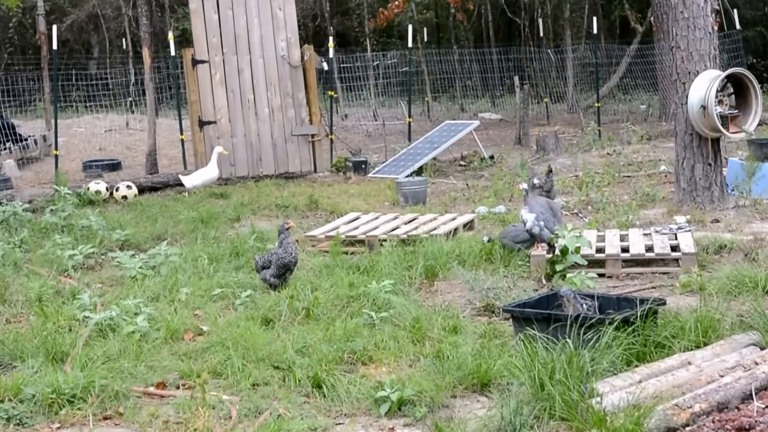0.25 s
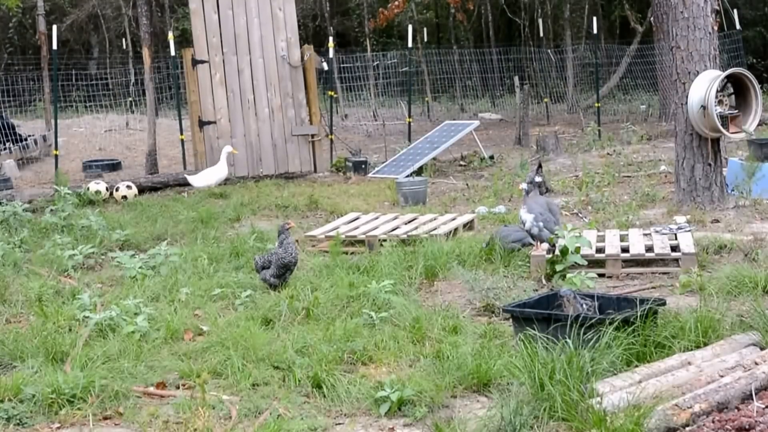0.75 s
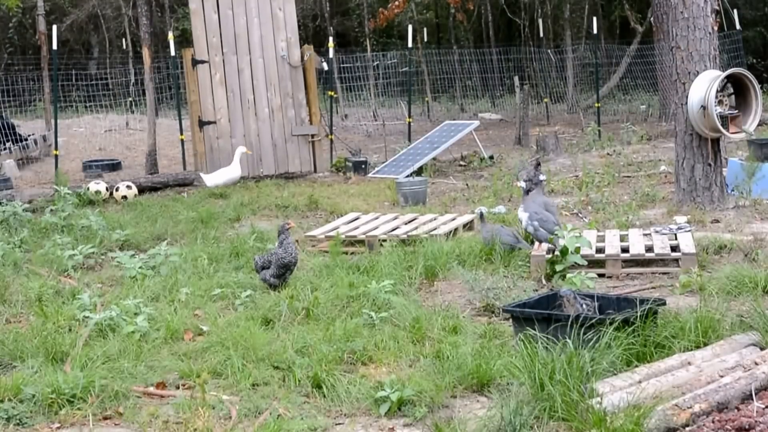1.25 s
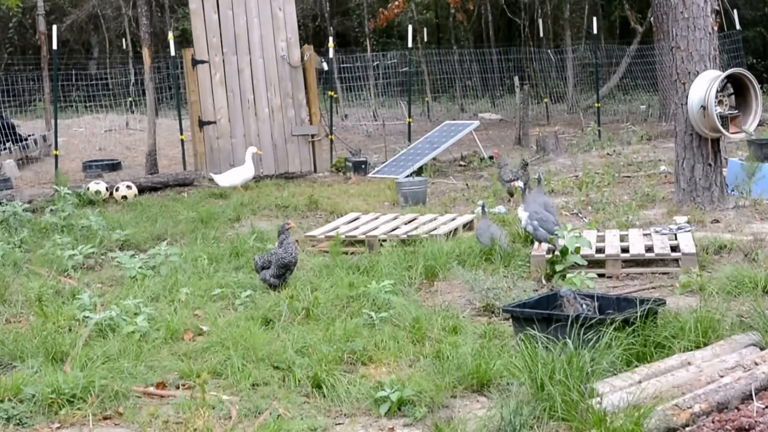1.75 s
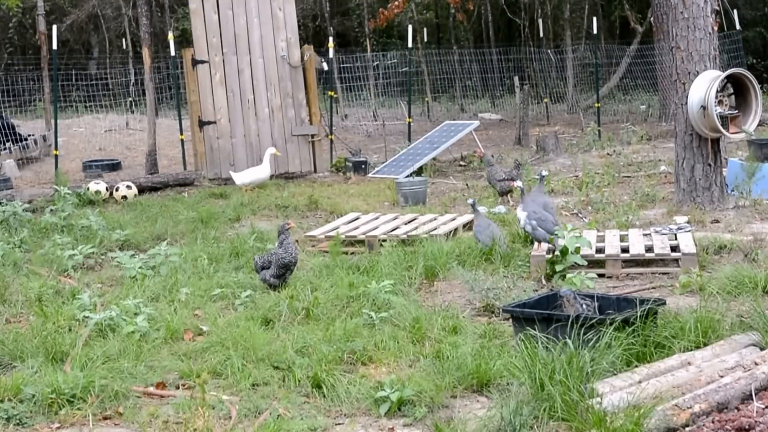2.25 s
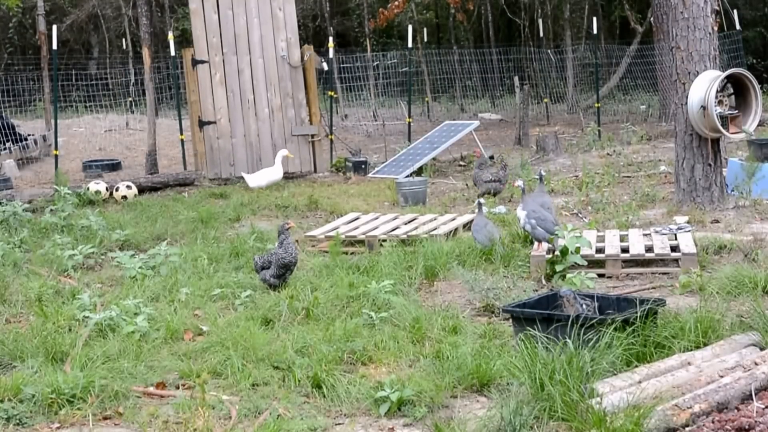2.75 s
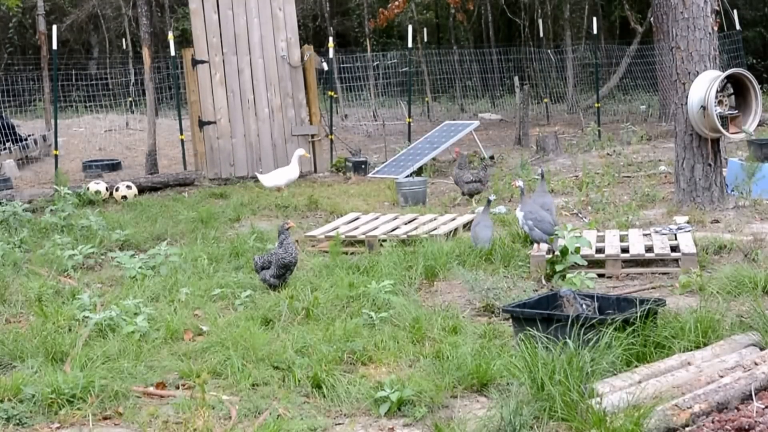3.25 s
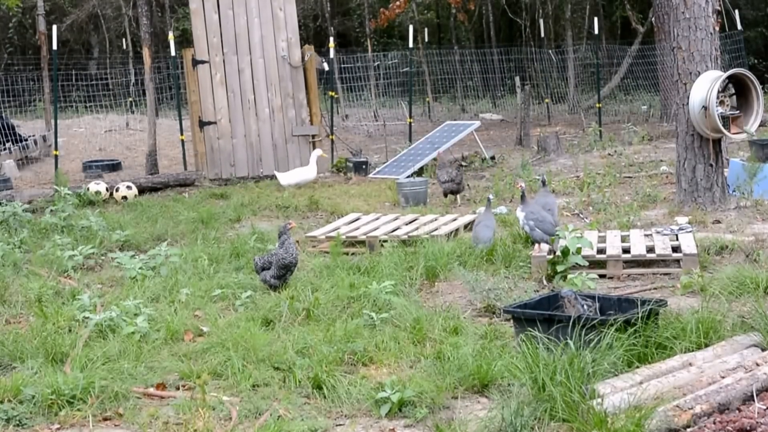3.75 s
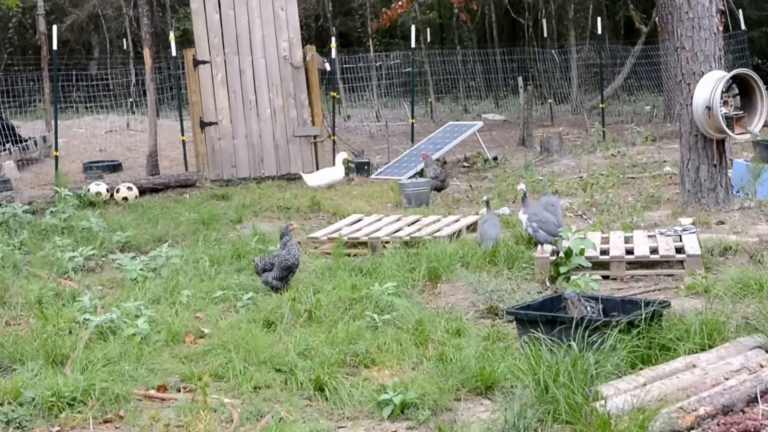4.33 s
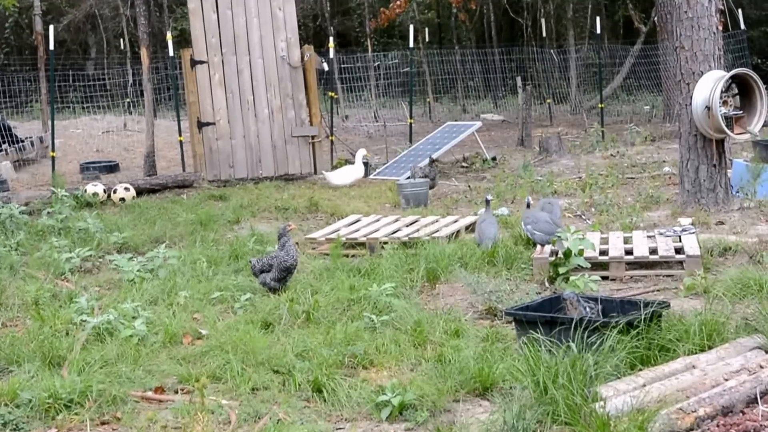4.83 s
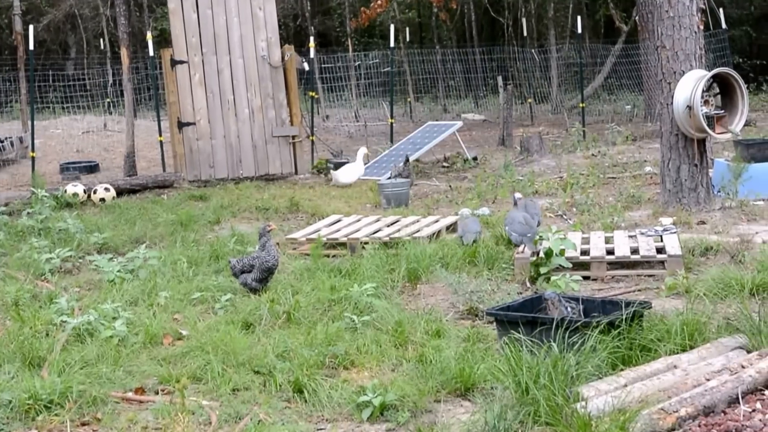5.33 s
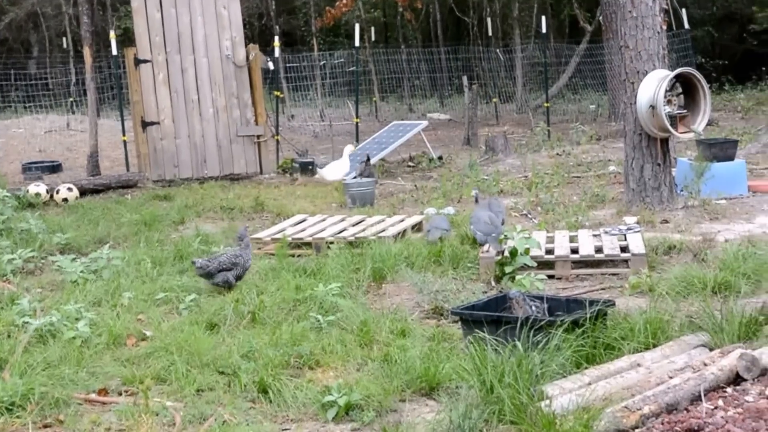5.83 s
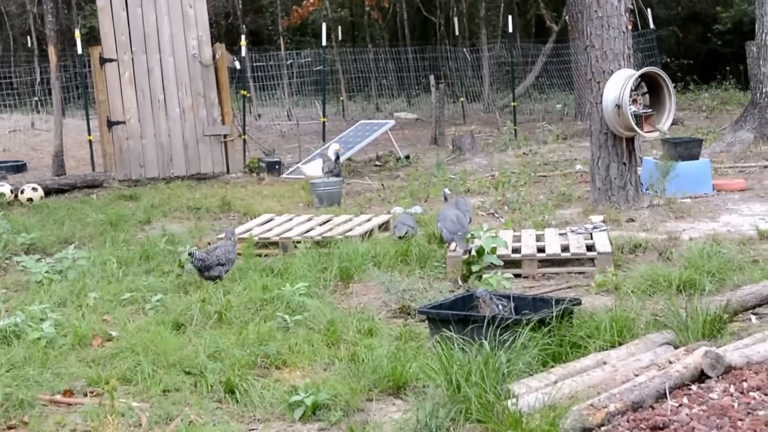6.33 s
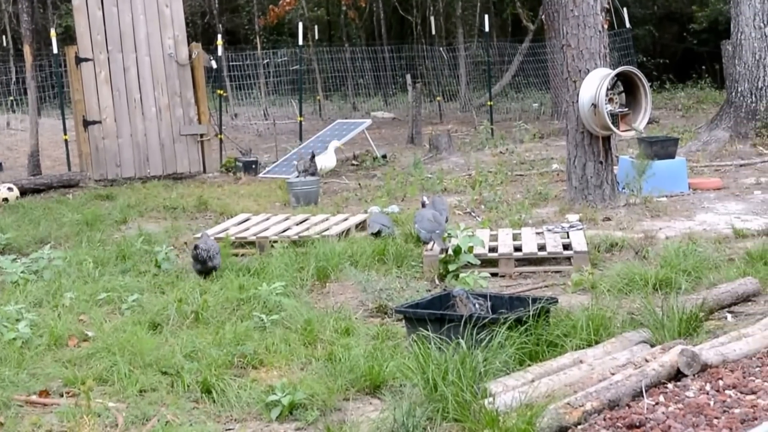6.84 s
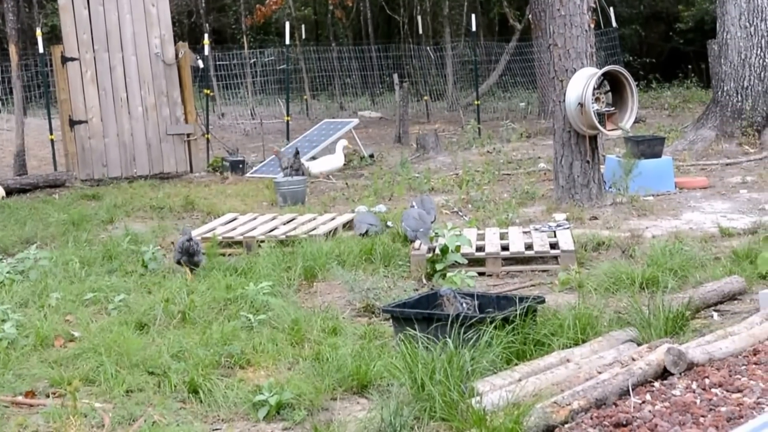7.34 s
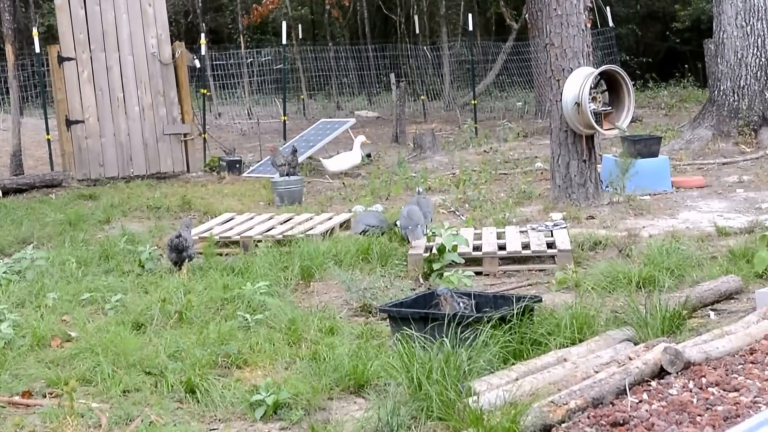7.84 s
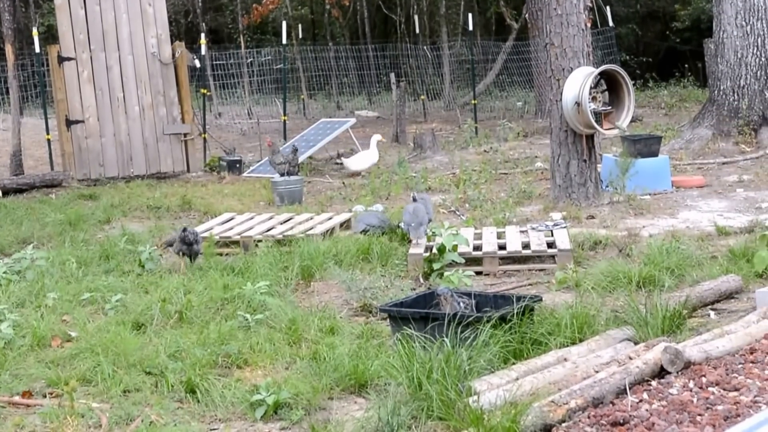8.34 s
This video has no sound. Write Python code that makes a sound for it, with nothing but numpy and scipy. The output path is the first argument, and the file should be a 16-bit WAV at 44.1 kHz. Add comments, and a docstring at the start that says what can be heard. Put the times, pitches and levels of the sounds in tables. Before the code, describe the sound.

Light rain patters outdoors with faint bird peeps, then a guinea fowl calls in short, increasingly raspy notes as a second bird yelps.

```python
"""Guinea fowl in light rain.

In a fenced poultry yard by a wood, drops pat and splash on the soil over a soft wash and a faint hum.
A guinea fowl starts with clear honks (syrinx harmonics) and works up to harsh squawks (uneven pulses
through windpipe and throat) that ring back from the trees; a second bird yelps in between.
Thin rising peeps, a few chirps and soft hen coos are nearly pure gliding tones."""
import sys
import numpy as np
from scipy import signal
from scipy.fft import rfft, irfft, next_fast_len
from scipy.io import wavfile
from scipy.ndimage import uniform_filter1d, minimum_filter1d

SR = 44100
rng = np.random.default_rng(int(sys.argv[2]) if len(sys.argv) > 2 else 0)


def wav_out(sig):
    """Save sig, one row per channel (or a flat mono array), as 16-bit PCM at SR to the path in sys.argv[1]."""
    wavfile.write(sys.argv[1], SR, np.round(np.clip(np.atleast_2d(sig).T, -1, 1) * 32767).astype(np.int16))


N = 377937
TIME_S = np.arange(N) / SR

# spectrum of far rain and air: freq_hz, density_db
WASH_SPECTRUM = [(15, -43), (25, -3.5), (108, -9.5), (217, -11), (270, -7), (326, -10), (451, -4),
                 (560, -3.5), (754, -0.5), (2760, -8.5), (5570, -15.5), (6920, -15.5), (10100, -14.5),
                 (14800, -21.5), (16000, -33)]
# left-right likeness of the wash: freq_hz, correlation
WASH_CORRELATION = [(30, -.45), (70, -.2), (125, .05), (250, .5), (500, .9), (1000, .97), (8000, .95),
                    (12000, .88)]
# strength of the wash: time_s, level_db
WASH_LEVEL = [(0, -43.5), (1.07, -43.5), (2.5, -46), (3.75, -42.5), (7.3, -48), (7.45, -43.5),
              (8.55, -42.5)]
# low distant swells: centre_s, width_s, level_db
HUM_SWELLS = [(1.41, .08, -57), (6.40, 0.15, -62.5)]
# heaviest near drops: start_s, level_db, treble_db
HEAVY_DROPS = [(.201, -18.5, -7.5), (.347, -24.5, -7), (.6101, -20.5, -10.5), (.6861, -34, 10.5),
               (.9017, -6, -20), (.908, -24.5, 1.5), (1.0319, -24, -7), (1.2461, -22, -21),
               (1.4158, -18.5, -16), (1.5749, -17.5, -20), (2.0748, -21, -19), (2.7461, -18.5, -13.5),
               (2.8995, -23.5, -7), (3.1314, -21.5, -6), (3.244, -19.5, -5.5), (3.3949, -24, -9),
               (3.9973, -14.5, -12), (5.0405, -9.5, -17.5), (5.2906, -18, -9), (5.4412, -19, -11),
               (5.6503, -17, -15), (7.3096, -21, -17), (7.3646, -24, -9), (7.677, -21.5, -9),
               (7.9312, -13.5, -11.5), (8.386, -16.5, -10.5)]
# reflections from ground, pallets and tub: delay_s, gain_db
YARD_REFLECTIONS = [(.0029, -19), (.0094, -9.5), (0.0128, -22)]
# colour of the echo from the trees: freq_hz, gain_db
ECHO_SPECTRUM = [(300, 10), (1000, -4), (2150, -1), (3000, 0), (4200, 2.5), (7000, -1), (15000, -4)]
# soft hen coos: start_s, length_s, first_hz, last_hz, level_db
HEN_COOS = [(.675, 0.06, 542, 590, -45.5), (.945, 0.047, 554, 579, -44.5), (1.23, 0.065, 630, 548, -47)]
# chirps: start_s, length_s, first_hz, last_hz, level_db
BIRD_CHIRPS = [(1.464, .064, 3600, 3876, -41), (2.856, .035, 2600, 3520, -46),
               (3.034, .043, 2460, 3370, -39), (4.546, 0.046, 2360, 3490, -38.5)]
# thin rising peeps: start_s, top_hz, level_db
BIRD_PEEPS = [(0.198, 8720, -32), (.302, 7900, -48), (1.704, 8500, -45), (2.159, 9200, -33.5),
              (2.912, 8200, -47), (3.226, 8700, -49), (6.32, 8840, -35.5), (7.305, 7840, -51),
              (8.065, 9100, -34)]
# second bird: start_s, length_s, pitch_hz, fall_share, level_db, tone_over_rasp_db
BIRD_YELPS = [(5.971, 0.041, 1548, 0.062, -17.5, 8), (6.028, 0.079, 1623, 0.024, -22.5, 1),
              (6.175, .027, 1128, 0.077, -21.5, -8), (6.287, .037, 1123, 0.185, -16, 18),
              (6.363, 0.029, 1718, 0.042, -19, 4), (6.38, .019, 1216, 0.052, -14, 17),
              (6.458, 0.033, 1713, .061, -22, -2), (6.574, 0.016, 1099, 0.065, -17.5, -15)]
# guinea fowl's bout: start_s, length_s, pitch_hz, level_db
FOWL_NOTES = [(3.802, 0.03, 960, -22.5), (4.02, .045, 985, -15), (4.212, 0.046, 1000, -11),
              (4.73, 0.036, 1012, -16.5), (4.961, .052, 986, -20.5), (5.139, .05, 1001, -12.5),
              (5.306, 0.064, 1069, -17), (5.491, 0.058, 1017, -14.5), (5.669, 0.059, 1059, -14.5),
              (5.857, .053, 1020, -13.5), (6.009, .048, 998.5, -11), (6.243, 0.056, 1075, -15),
              (6.482, .06, 1072, -13.5), (6.734, 0.062, 1062, -14.5), (6.951, 0.05, 1063, -15)]
# clear honks, forced rasps, then half clear: time_s, tone_over_rasp_db
FOWL_CLARITY = [(3.8, 7.5), (4.2, 12), (4.73, 7.5), (4.96, 2), (5.14, 9.5), (5.3, -24), (6.0, -12.5),
                (6.25, -3.5), (6.95, 0)]
# beak opening, 0 half shut to 1 wide: time_s, gape_share
BEAK_GAPE = [(3.8, 0.22), (5.5, 0.25), (6.0, 0.39), (6.25, 0.99), (6.95, 0.74)]
# clear tone by beak opening: harmonic_number, half_shut_db, wide_db
TONE_HARMONICS = [(1, -6.5, 0.5), (2, -5, 19), (3, 7, -12.5), (4, -6, -18), (5, -23, -9)]
# rasp colour, beak half shut: freq_hz, gain_db
RASP_HALF_SHUT = [(180, -69.5), (300, -48), (356, -25.5), (884, -24), (1060, -17), (1170, -15),
                  (1400, -0.5), (1620, -2.5), (1750, -11.5), (2050, -2.5), (3130, -6.5), (3350, 0),
                  (3620, -9.5), (3920, -5), (7000, -35), (9100, -44), (15400, -120)]
# rasp colour, beak wide: freq_hz, gain_db
RASP_WIDE = [(180, -71), (300, -62), (850, -48.5), (1050, -10), (1260, -16.5), (1400, -15.5), (1560, -8),
             (1920, -13.5), (2140, -9), (2610, -8), (2860, -1), (3570, -11), (4780, -10.5), (6220, -23),
             (7000, -24.5), (9100, -21.5), (15400, -120)]
# hiss colour, beak half shut: freq_hz, gain_db
BREATH_HALF_SHUT = [(3530, -25), (6000, 3.5), (8130, 0.5), (10200, 6.5), (12200, -2), (13600, -7),
                    (15300, -11), (16000, -12)]
# hiss colour, beak wide: freq_hz, gain_db
BREATH_WIDE = [(3530, -34), (6000, -25.5), (6700, -22), (7280, -4), (8100, -9.5), (10200, 4.5),
               (12900, -3.5), (16000, -15)]

SPLASH_HZ, SPLASH_WIDTH_HZ = 3500, 7000


def from_db(db):
    """Decibels to gain."""
    return 10 ** (np.asarray(db) / 20)


def unit_rms(x):
    """Scale to unit rms."""
    return x / np.sqrt(np.mean(x ** 2) + 1e-20)


def hold_rms(x, window_s=.0049):
    """Hold the short-term rms near 1."""
    power = np.maximum(uniform_filter1d(x * x, int(window_s * SR) + 1), 0)
    return x / np.sqrt(power + 1e-3 * np.mean(x * x))


def at_hz(points, hz):
    """Read a table on a log-frequency axis."""
    freq_hz, value = np.transpose(points)
    return np.interp(np.log(hz + 1e-3), np.log(freq_hz), value)


def at_time(points, time_s):
    """Read a table on a time axis."""
    return np.interp(time_s, *np.transpose(points))


def colour(x, spectrum):
    """Minimum-phase filter with the given spectrum."""
    size = 2 * next_fast_len(len(x))
    cepstrum = irfft(np.log(from_db(at_hz(spectrum, np.fft.rfftfreq(size, 1 / SR)))))
    cepstrum[1:size // 2] *= 2
    cepstrum[size // 2 + 1:] = 0
    return irfft(rfft(x, size) * np.exp(rfft(cepstrum)))[:len(x)]


def drift(rate_hz, size):
    """Smooth random curve, spread near 1."""
    position = np.arange(size) * rate_hz / SR
    knots = int(position[-1]) + 2
    return np.interp(position, np.arange(knots), rng.standard_normal(size)[:knots])


def resonate(x, hz, width_hz):
    """Two-pole resonance, peak gain 1."""
    r = np.exp(-np.pi * width_hz / SR)
    feedback = [1, -2 * r * np.cos(2 * np.pi * hz / SR), r * r]
    return signal.lfilter(np.array([1, 0, -1]) * (1 - r * r) / 2, feedback, x + 1e-18)


def add(out, start_s, x):
    """Mix x in at start_s."""
    i = max(int(start_s * SR), 0)
    out[i:i + len(x)] += x[:max(N - i, 0)]


def envelope(t, length_s, attack_s, release_s):
    """Smooth rise, hold, exponential decay after length_s."""
    rise = np.sin(np.pi / 2 * np.clip(t / attack_s, 0, 1)) ** 2
    return rise * np.exp(-np.maximum(t - length_s, 0) / release_s)


def rain_wash():
    """Distant rain merges to a soft hiss; mainly the low stir of air differs between the ears."""
    hz = np.fft.rfftfreq(2 * N, 1 / SR)
    alike = np.clip(at_hz(WASH_CORRELATION, hz), -.5, .999)
    mid, side = rfft(rng.standard_normal((2, 2 * N))) * from_db(at_hz(WASH_SPECTRUM, hz))
    stereo = irfft(np.sqrt(1 + alike) * mid + np.sqrt(1 - alike) * side * [[1], [-1]])[:, :N]
    return unit_rms(stereo) * from_db(at_time(WASH_LEVEL, TIME_S))


def far_hum(hum_hz=70.8, level_db=-74, swell_hz=107):
    """A faint far hum, and a higher one that swells briefly."""
    steady = from_db(level_db + 2 * drift(1.92, N)) * np.sin(2 * np.pi * hum_hz * TIME_S)
    swells = sum(from_db(db) * np.exp(-((TIME_S - centre_s) / width_s) ** 2)
                 for centre_s, width_s, db in HUM_SWELLS)
    return np.sqrt(2) * (steady + swells * np.sin(2 * np.pi * swell_hz * TIME_S))


def yard_echo(x):
    """Distinct reflections, scatter from gate and fence, then a longer echo from the trunks."""
    t = TIME_S[:SR]

    def scatter(delay_s, t60_s, taps_per_s):
        taps = rng.standard_normal(SR) * (rng.random(SR) < taps_per_s / SR)
        return unit_rms(taps * (t > delay_s) * from_db(-60 * t / t60_s)) / np.sqrt(SR)

    fence = from_db(-8.5) * scatter(delay_s=.011, t60_s=.2, taps_per_s=2500)
    trunks = from_db(-12) * scatter(delay_s=.017, t60_s=.87, taps_per_s=5000)
    response = fence + trunks
    for delay_s, gain_db in YARD_REFLECTIONS:
        response[round(delay_s * SR)] += from_db(gain_db)
    return signal.fftconvolve(x, colour(response, ECHO_SPECTRUM))[:N]


def pat(clicks, ring_hz, damping=.54, soil_hz=1900, edge_share=.023):
    """A drop on soft ground: about one cycle of dull ring, rounded by the soil but for a thin edge."""
    ring = resonate(clicks, ring_hz, damping * ring_hz)
    rounded = signal.sosfilt(signal.butter(2, soil_hz, fs=SR, output="sos"), ring)
    return resonate(rounded + edge_share * ring, hz=700, width_hz=12300)


def far_patter(drops_per_s=250, spread_db=6.5, cluster_db=4.5, pat_db=-52.5, tick_db=-56.5):
    """Farther drops in loose clusters: each a dull pat with a tick of splash."""
    pitches_hz = np.geomspace(560, 2200, num=7)
    chance = drops_per_s / len(pitches_hz) / SR * from_db(cluster_db * drift(6.9, N))
    pats, ticks = 0, 0
    for hz in pitches_hz:
        clicks = from_db(spread_db * np.minimum(rng.exponential(1, N), 3)) * (rng.random(N) < chance)
        pats += unit_rms(pat(clicks, hz))
        ticks += resonate(clicks * rng.standard_normal(N), SPLASH_HZ, SPLASH_WIDTH_HZ)
    return from_db(pat_db) * unit_rms(pats) + from_db(tick_db) * unit_rms(ticks)


def light_drops(drops_per_s=9, count=200):
    """Lighter drops at random intervals: rows of start_s, level_db, treble_db."""
    start_s = np.cumsum(rng.exponential(size=count)) / drops_per_s
    weight, brightness = np.clip(rng.standard_normal((count, 2)), -2, 2).T
    level_db, treble_db = -26 + 1.5 * weight, -15.5 + 5 * brightness
    return np.column_stack([start_s, level_db, treble_db])[start_s < N / SR]


def near_drops(drops, ring_hz=710.4, ring_spread=.094, trim_db=-.5, splash_db=4.5, splash_s=.0006):
    """Each near drop pats and throws a brief bright splash."""
    out, t = np.zeros(N), TIME_S[:SR // 40]
    impact = -1.0 * (t == 0)
    for start_s, level_db, treble_db in drops:
        body = pat(impact, ring_hz * np.exp(ring_spread * rng.standard_normal()))
        spray = unit_rms(resonate(rng.standard_normal(len(t)), SPLASH_HZ, SPLASH_WIDTH_HZ))
        splash = from_db(treble_db + splash_db) * spray * np.exp(-t / splash_s)
        add(out, start_s, from_db(level_db + trim_db) * (body / abs(body).max() + splash))
    return out


def whistles(calls, waver_hz, bend=1.7):
    """Nearly pure calls that glide, level off and quaver."""
    out, size = np.zeros(N), SR // 10
    for start_s, length_s, first_hz, last_hz, level_db in calls:
        along = np.minimum(TIME_S[:size] / length_s, 1)
        hz = last_hz + (first_hz - last_hz) * (1 - along) ** bend + waver_hz * drift(901, size)
        tone = np.sqrt(2) * np.sin(2 * np.pi * np.cumsum(hz) / SR)
        add(out, start_s, from_db(level_db) * np.sin(np.pi * along) * tone)
    return out


def other_birds(peep_s=.049, peep_start_share=.75):
    """Whistled peeps, lower chirps and hen coos."""
    peeps = [(start_s, peep_s, peep_start_share * hz, hz, db) for start_s, hz, db in BIRD_PEEPS]
    return (whistles(peeps, waver_hz=160) + whistles(BIRD_CHIRPS, waver_hz=250)
            + whistles(HEN_COOS, waver_hz=69))


def beak_spectrum(half_shut, wide, gape):
    """Blend two spectra by beak opening."""
    hz = np.geomspace(100, SR / 2, num=400)
    return np.column_stack([hz, (1 - gape) * at_hz(half_shut, hz) + gape * at_hz(wide, hz)])


def windpipe(x, round_trip_s=.0009, reflection=.55):
    """Each beat bounces up and down the windpipe and spreads in time: an all-pass."""
    feedback = np.r_[1, np.zeros(round(round_trip_s * SR) - 1), reflection]
    return signal.lfilter(feedback[::-1], feedback, x)


def honk(t, cycles, length_s, gape, squeak_ratio=1.63, squeak_db=-14):
    """Clear voice: a squeak in a higher register breaks down to the harmonic tone."""
    phase = 2 * np.pi * cycles
    tone = sum(from_db(shut_db + gape * (wide_db - shut_db)) * np.sin(k * phase)
               for k, shut_db, wide_db in TONE_HARMONICS)
    squeak = np.sin(squeak_ratio * phase) + np.sin(2 * squeak_ratio * phase)
    return (unit_rms(tone) * envelope(t, length_s - .003, .019, .0018)
            + from_db(squeak_db) * squeak * envelope(t, .0036, .0013, .00087))


def forced_beats(cycles, pitch_hz, gape, jitter_cycles=.04, lurch=.36, weak_gain=.037, uneven_db=3):
    """Forced syrinx: every third beat is strong; timing lurches, most with the beak half shut."""
    size = len(cycles)
    beat = np.arange(int(cycles[-1]) - 2)
    timing, weight = rng.standard_normal((size, 2))[:len(beat)].T
    index = np.searchsorted(cycles, beat + .5 + jitter_cycles * timing)
    index = index + lurch * (1 - .7 * gape) * drift(130, size)[index] * SR / pitch_hz
    strength = np.where(beat % 3 == 0, 1, weak_gain) * from_db(uneven_db * np.clip(weight, -2, 2))
    pulses = np.zeros(size)
    pulses[np.clip(index.astype(int), 0, size - 1)] = strength
    return pulses


def squawk(length_s, pitch_hz, fall_share, gape, tone_db, rasp_db, hiss_db,
           trill_hz=105, flutter_db=3, push_db=4, puff_s=.0021):
    """One note of the syrinx: clear tone, pulsed rasp and breath hiss."""
    size = SR // 7
    t = TIME_S[:size]
    along = np.minimum(t / length_s, 1.1)
    # a fast membrane trill makes the upper harmonics hoarse
    trill = .012 * np.sin(2 * np.pi * (trill_hz * t + rng.random()))
    scoop, waver = .041 * np.exp(-t / .007), .016 * drift(400, size)
    cycles = np.cumsum(pitch_hz * (1 - scoop - fall_share * along ** 3 + trill + waver)) / SR
    # pressure builds and flutters
    effort = from_db(flutter_db * drift(231.4, size) + push_db * (np.minimum(along, .6) - 1))
    tone = honk(t, cycles, length_s, gape)
    pulses = forced_beats(cycles, pitch_hz, gape)
    # each beat lets out a puff of turbulent air
    airflow = unit_rms(signal.lfilter([1], [1, -np.exp(-1 / (puff_s * SR))], pulses))
    puffs = airflow * rng.standard_normal(size)
    buzz = unit_rms(pulses - pulses.mean()) + .25 * puffs
    throat = colour(buzz, beak_spectrum(RASP_HALF_SHUT, RASP_WIDE, gape))
    rasp = hold_rms(windpipe(throat)) * envelope(t, length_s - .003, .0046, .0054)
    breath = colour(puffs, beak_spectrum(BREATH_HALF_SHUT, BREATH_WIDE, gape))
    hiss = breath / breath[t < length_s].std() * envelope(t, length_s - .008, .016, .016)
    return effort * (from_db(tone_db) * tone + from_db(rasp_db) * rasp + from_db(hiss_db) * hiss)


def split_level(level_db, tone_over_rasp_db):
    """Share a note's power between tone and rasp."""
    rasp_db = level_db - 10 * np.log10(1 + from_db(tone_over_rasp_db) ** 2)
    return rasp_db + tone_over_rasp_db, rasp_db


def yelping_bird(gape=.56, hiss_offset_db=-23):
    """A second bird's short yelps and squeals, at one beak opening."""
    out = np.zeros(N)
    for start_s, length_s, pitch_hz, fall_share, level_db, tone_over_rasp_db in BIRD_YELPS:
        tone_db, rasp_db = split_level(level_db, tone_over_rasp_db)
        hiss_db = level_db + hiss_offset_db
        add(out, start_s, squawk(length_s, pitch_hz, fall_share, gape, tone_db, rasp_db, hiss_db))
    return out


def guinea_fowl(fall_share=.026, hiss_offset_db=-23, loud_db=-14):
    """The bout of notes, hissier as the voice is louder, more forced and the beak opens."""
    out = np.zeros(N)
    for start_s, length_s, pitch_hz, level_db in FOWL_NOTES:
        gape = at_time(BEAK_GAPE, start_s)
        tone_db, rasp_db = split_level(level_db, at_time(FOWL_CLARITY, start_s))
        rasp_share = from_db(rasp_db - level_db) ** 2
        hiss_db = level_db + hiss_offset_db + .3 * (level_db - loud_db) + 6 * rasp_share + 10 * gape
        add(out, start_s, squawk(length_s, pitch_hz, fall_share, gape, tone_db, rasp_db, hiss_db))
    return out


def scene(others_send_db=3, drops_send_db=-6):
    """Birds and drops straight ahead, rain all round."""
    fowl = guinea_fowl() + yelping_bird()
    drops = near_drops(HEAVY_DROPS) + near_drops(light_drops())
    others = other_birds()
    echo = yard_echo(fowl + from_db(others_send_db) * others + from_db(drops_send_db) * drops)
    return fowl + others + drops + echo + far_patter() + far_hum() + rain_wash()


def record(dry):
    """Fast peak limiter, then a steep low-pass."""
    ceiling, window, cutoff_hz = .72, SR // 250, 16000
    gain = ceiling / np.maximum(abs(dry).max(axis=0), ceiling)
    limited = dry * uniform_filter1d(minimum_filter1d(gain, window), window)
    return signal.sosfilt(signal.ellip(10, .2, 80, cutoff_hz, fs=SR, output="sos"), limited)


dry = scene()
out = record(dry)
wav_out(out)
```